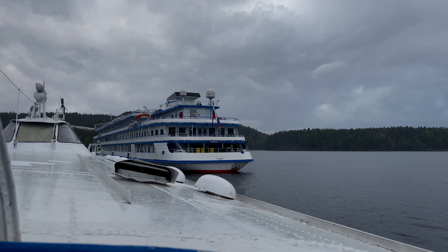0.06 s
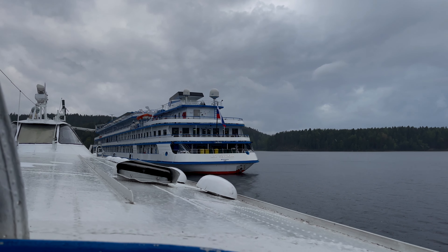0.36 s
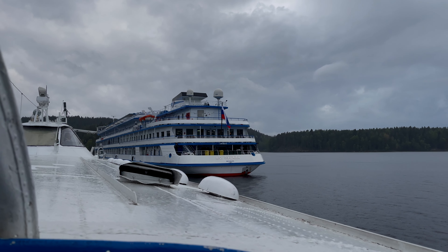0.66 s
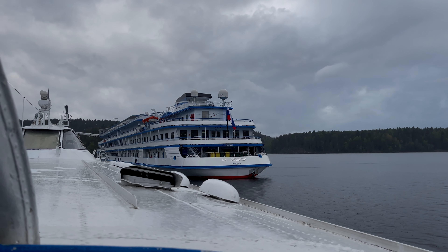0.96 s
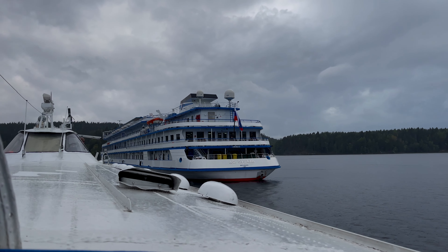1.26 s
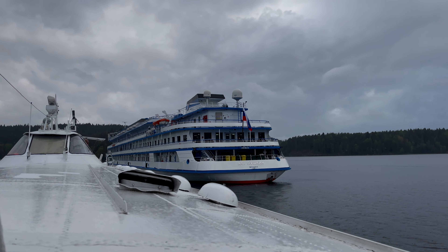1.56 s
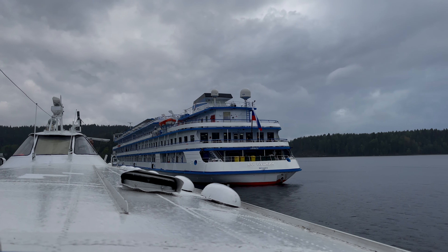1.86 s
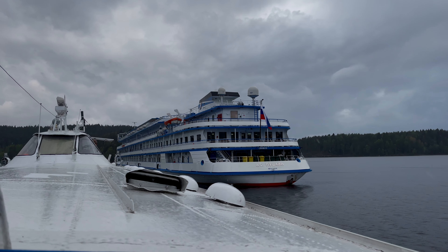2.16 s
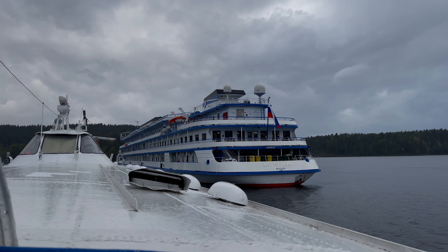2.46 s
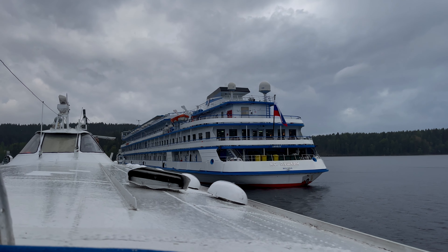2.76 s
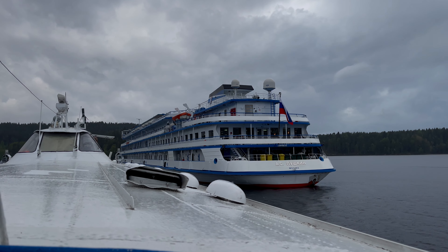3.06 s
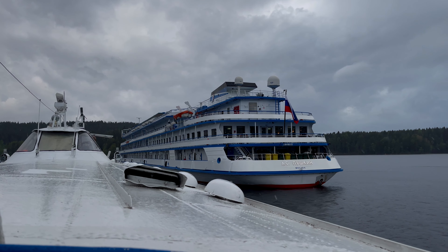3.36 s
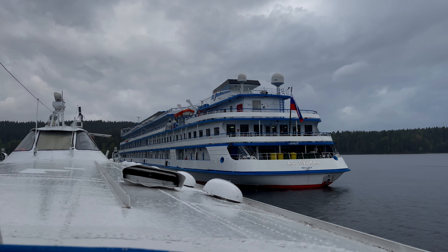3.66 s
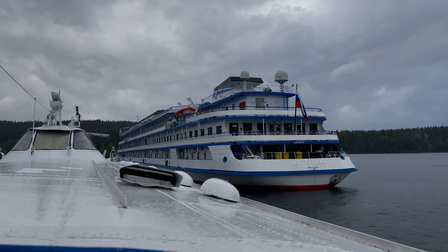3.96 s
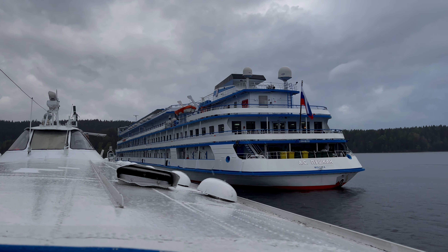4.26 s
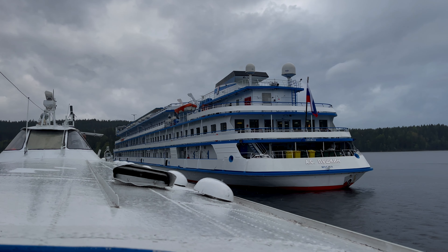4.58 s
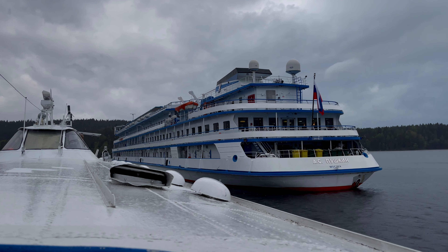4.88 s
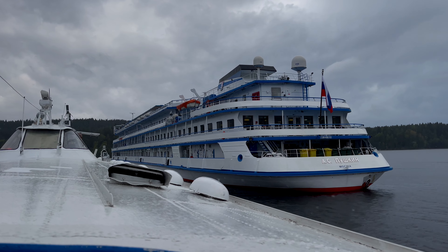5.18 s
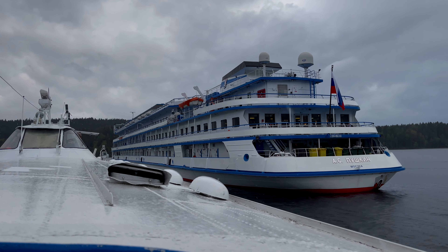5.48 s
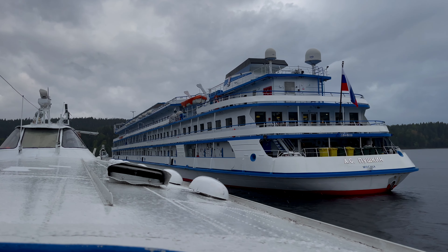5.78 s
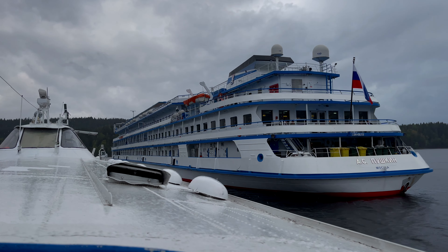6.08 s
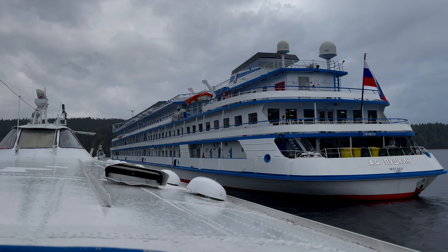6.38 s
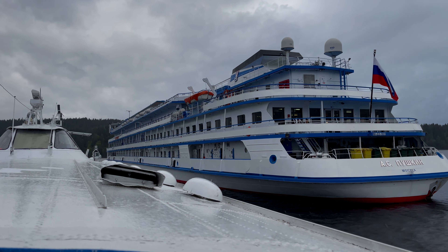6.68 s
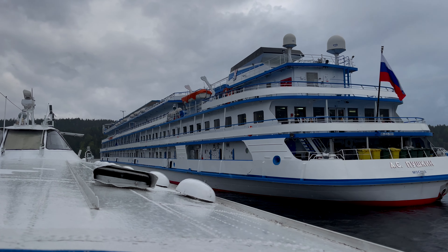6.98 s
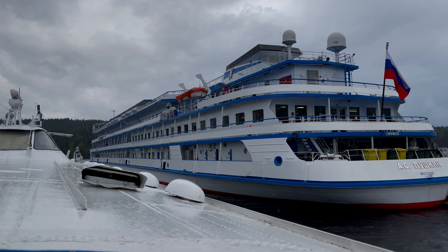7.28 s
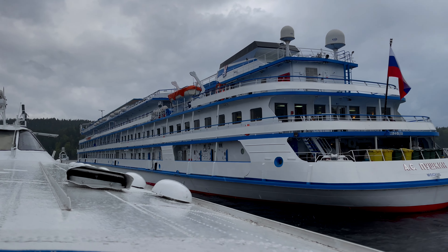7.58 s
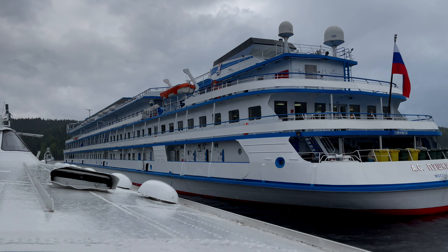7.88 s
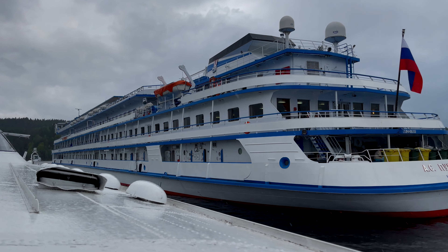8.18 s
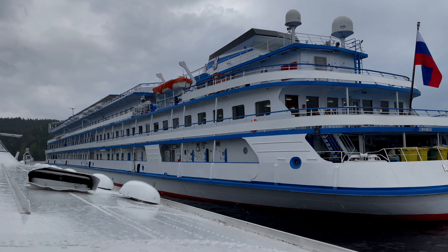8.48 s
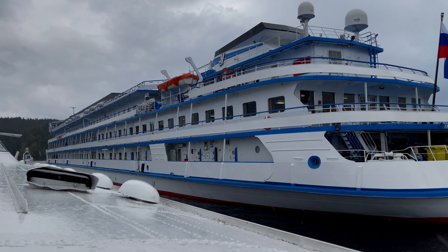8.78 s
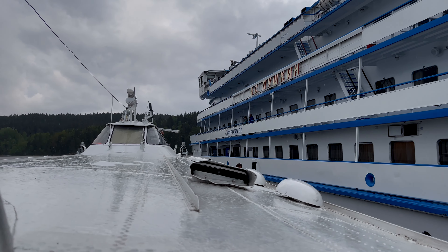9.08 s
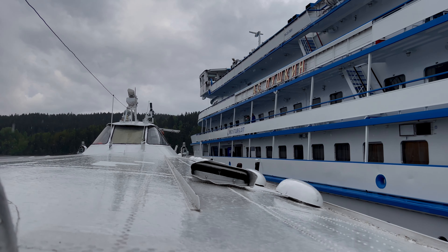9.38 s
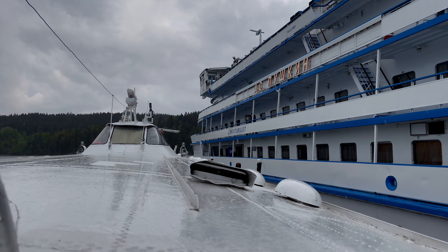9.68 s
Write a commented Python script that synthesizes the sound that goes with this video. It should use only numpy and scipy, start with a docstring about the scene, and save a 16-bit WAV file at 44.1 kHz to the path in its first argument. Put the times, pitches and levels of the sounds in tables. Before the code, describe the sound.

Ship diesels throb under rushing wind and water with thin whines, ease off halfway, then a closer engine swells with spray.

```python
"""On a lake, on the open deck of a small motor boat closing on a river cruise ship; stereo microphones.
Diesel exhausts throb under a rush of wind and water and ease off halfway. A turbocharger winds down,
gears whine, an air intake whistles and pumps hum. Close by, wind buffets the microphones, drops tick
and something knocks once. Near the end the sound cuts to the boat lying alongside: the whines are gone,
one engine swells and brighter spray washes up between the hulls."""
import sys
import numpy as np
from scipy import signal
from scipy.fft import rfft, irfft
from scipy.io import wavfile
from scipy.ndimage import uniform_filter1d

SR = 44100
rng = np.random.default_rng(int(sys.argv[2]) if len(sys.argv) > 2 else 0)


def wrap_up_sound(samples):
    """Save the sound to the file named by the first command line argument, as 16-bit audio."""
    columns = np.atleast_2d(samples).T
    # keep every value between -1 and 1, then stretch to whole-number steps
    tamed = np.clip(columns, -1, 1)
    steps = np.round(tamed * 32767).astype(np.int16)
    wavfile.write(sys.argv[1], SR, steps)


N = 429409
TIME = np.arange(N) / SR
SIDES = np.array([[.5], [-.5]])  # splits a left-right difference between the microphones
ALONGSIDE_S = 8.93


def amp(db):
    """Decibels to gain."""
    return 10 ** (np.asarray(db) / 20)


def at_hz(points, hz):
    """A spectrum's value at hz, on a log-frequency axis."""
    freqs, values = np.transpose(points)
    return np.interp(np.log(hz + 1), np.log(freqs + 1), values)


def follow(rows):
    """Each column of a timed curve, sample by sample."""
    times, *columns = np.transpose(rows)
    return [np.interp(TIME, times, column) for column in columns]


def drift(rate_hz):
    """Random wander of rms 1, with changes up to about rate_hz."""
    hz = np.fft.rfftfreq(N // 64 + 2, 64 / SR)
    wander = irfft(rfft(rng.standard_normal(N // 64 + 2)) / np.sqrt(1 + (hz / rate_hz) ** 4))
    return np.interp(np.arange(N) / 64, np.arange(len(wander)), wander / wander.std())


def pulse(hz):
    """A cosine that follows a changing rate."""
    return np.cos(2 * np.pi * np.cumsum(hz) / SR)


def add(mix, start_s, sound):
    """Adds a stereo sound to the mix."""
    part = mix[:, max(round(start_s * SR), 0):][:, :sound.shape[1]]
    part += sound[:, :part.shape[1]]


# How far the left microphone on deck leads the right: freq_hz, lead_rad
MIC_LEAD = [(0, -0.35), (500, 0.24), (1100, .5), (1500, 3), (2400, 5.5), (3400, 9.5), (4000, 11),
            (5300, 16), (6100, 19), (6800, 19.5), (7150, 17.5), (7900, 19.5), (8600, 20.5), (9700, 16.5),
            (10400, 15.5), (11700, 12.5)]
# How much louder the left microphone is: freq_hz, pan_db
MIC_BALANCE = [(60, -0.5), (110, 2), (200, 1), (350, 2.5), (640, 2.5), (1150, 2), (2080, -1.5), (3750, -1),
               (6770, -2), (12200, 0.5)]
def tone(hz, db, scatter, flutter_hz, lead=None, pan_db=None, crest_s=0):
    """One partial at both microphones: a direct path plus wavering echoes off water and steel."""
    carrier = np.exp(2j * np.pi * (np.cumsum(hz * np.ones(N)) / SR - np.mean(hz) * crest_s))
    lead = at_hz(MIC_LEAD, np.mean(hz)) if lead is None else lead
    pan_db = at_hz(MIC_BALANCE, np.mean(hz)) if pan_db is None else pan_db
    echoes = np.array([drift(flutter_hz) + 1j * drift(flutter_hz) for _ in range(2)]) / np.sqrt(2)
    paths = (np.exp(1j * SIDES * lead) + scatter * echoes) / np.sqrt(1 + scatter ** 2)
    return np.sqrt(2) * amp(db + SIDES * pan_db) * (carrier * paths).real


# How alike the rush is at the two microphones, clipped to 0-1 in use: freq_hz, likeness
MIC_LIKENESS = [(60, 0.83), (330, 0.82), (550, 0.2), (800, 0.54), (1300, -0.4), (1750, 0.33), (2300, -0.03),
                (3200, .5), (3800, -0.58), (5500, 0.7), (6400, 0.6), (7000, 0), (8500, 0.7), (8900, 6),
                (9500, 1), (10200, 3.5), (11400, 2.7), (11800, -3)]
def rush(spectrum, resonances, hiss_db, patchy_db, gust_db, bass_db, surge, swell_db, fade_db_per_s=0):
    """Turbulent noise with drifting patches and gusts, coloured by resonances that surge together."""
    frames = dict(fs=SR, nperseg=2048, noverlap=1536)
    hz, t, (left, other) = signal.stft(rng.standard_normal((2, N)) * np.sqrt(SR / 2), **frames)
    hz = hz[:, None]
    alike = np.clip(at_hz(MIC_LIKENESS, hz), 0, 1)
    right = (alike * left + np.sqrt(1 - alike ** 2) * other) * np.exp(-1j * at_hz(MIC_LEAD, hz))
    tilt = amp(at_hz(MIC_BALANCE, hz) / 2)
    lows = 1 / (1 + (hz / 300) ** 2)
    highs = 1 / (1 + (4500 / (hz + 1)) ** 4)
    db = at_hz(spectrum, hz) + bass_db / (1 + (hz / 120) ** 4)
    db -= 10 * np.log10(1 + (hz / 12700) ** 60)  # steep top edge of the hiss
    db = db + lows * swell_db * np.interp(t, TIME, drift(1.8))
    db += (1 - highs) * fade_db_per_s * (t.mean() - t)
    db += highs * np.interp(t, TIME, hiss_db)
    lifts_db = sum(lift * .5 ** (2 * (hz - centre) / width) ** 2 for centre, width, lift in resonances)
    db += lifts_db * (1 + surge * np.interp(t, TIME, drift(18)))
    patches = uniform_filter1d(rng.standard_normal(left.shape), 20, axis=0)
    patches = uniform_filter1d(patches, 7, axis=1)
    db += patchy_db * patches / patches.std() * (1 - .5 * highs)
    db += gust_db * np.interp(t, TIME, drift(20))
    return signal.istft(np.array([left * tilt, right / tilt]) * amp(db), **frames)[1][:, :N]


# Exhaust, wind and water, from the deck some way behind the ship: freq_hz, level_db
ASTERN_SPECTRUM = [(20, -69), (42, -38), (100, -35), (200, -44.5), (400, -54), (780, -53.5), (1500, -61),
                   (2200, -67), (3600, -74), (6400, -78), (7200, -82), (8600, -85.5), (10400, -81),
                   (11700, -89.5), (13000, -108.9)]
# Casings and air intakes ringing across the water: centre_hz, width_hz, lift_db
ASTERN_CASINGS = [(119, 23.5, -5), (319, 8.8, 6.5), (331, 6.9, 6), (501, 127, 3.5), (636.1, 16.8, 9.5),
                  (724, 32, 3.5), (846, 67, 0.5), (1020, 150, -1), (1327, 63, 5), (2880, 590, 6),
                  (2990, 100, 1.5), (3030, 80, -1)]
def rush_astern():
    """The roar behind the ship, with a hiss of water that sinks as the boat slows."""
    return rush(ASTERN_SPECTRUM, ASTERN_CASINGS, hiss_db=0.28 - 0.24 * TIME, patchy_db=1.17,
                gust_db=0.44, bass_db=-3.5, surge=0.28, swell_db=1.0, fade_db_per_s=0.09)


# Exhaust, wind and water, close beside the hull: freq_hz, level_db
ALONGSIDE_SPECTRUM = [(20, -59), (42, -37.5), (100, -44.5), (200, -47), (350, -53.5), (650, -52),
                      (1100, -59.5), (2200, -66), (3600, -75), (6400, -76.5), (8400, -81.5), (10400, -75.5),
                      (11700, -83.5), (13000, -107.0)]
# Casings ringing at close range: centre_hz, width_hz, lift_db
ALONGSIDE_CASINGS = [(135, 60, 0.5), (295, 19, 3.7), (464, 19, 9.2), (670, 23, 2.6), (960, 20, 3)]
# Spray between the hulls, near the microphones: peak_s, half_length_s, lift_db
SPRAY_WASHES = [(9.086, 0.18, 5), (9.604, 0.17, 7.5)]
def rush_alongside(lull_db=-4.5):
    """The roar beside the hull, its hiss lifted twice as spray washes up."""
    spray_db = sum(db * np.exp(-((TIME - peak_s) / half_s) ** 2) for peak_s, half_s, db in SPRAY_WASHES)
    return rush(ALONGSIDE_SPECTRUM, ALONGSIDE_CASINGS, hiss_db=lull_db + spray_db, patchy_db=0.7,
                gust_db=1.16, bass_db=-1.5, surge=.12, swell_db=-1.5)


# Pumps and fans, faint across the water: pitch_hz, level_db
PUMP_HUMS = [(293, -37.5), (340, -35.5), (635.5, -38.5), (746, -37), (1105, -54), (1185, -45.5),
             (1402, -44.5), (1483, -43)]
def pumps():
    """Pumps and fans hold their notes, heard mostly by way of echoes."""
    return sum(tone(hz, db, scatter=1.2, flutter_hz=5.2) for hz, db in PUMP_HUMS)


def intake(pitch_hz=2815, warble_hz=16.77, wander_hz=14, gulp_hz=70):
    """An air intake whistles in rough bursts, chopped by the gulps of the cylinders."""
    hz = pitch_hz + warble_hz * drift(20.8) + wander_hz * drift(4.18)
    gulps = 1 + 0.23 * pulse(gulp_hz * (1 + 0.086 * drift(9.7)))
    db = -44.5 + 0.29 * TIME + 3.5 * drift(18)  # grows as the boat nears
    return gulps * tone(hz, db, scatter=1.0, flutter_hz=36)


# Gear whine surging and fading, heard from astern, a little to the right: time_s, level_db
GEAR_WHINE = [(0, -42.5), (.55, -43), (1.15, -49), (1.95, -42), (2.2, -51), (2.65, -38), (2.83, -50),
              (3.25, -38.5), (3.72, -41.5), (4.15, -38), (4.95, -52), (5.17, -39), (5.35, -42),
              (5.95, -39.5), (6.1, -58), (6.8, -41), (7.1, -43), (7.8, -45), (8.35, -47), (8.78, -43),
              (8.89, -38)]
# Its octave, a little to the left: time_s, level_db
GEAR_OVERTONE = [(0, -52), (.7, -48), (1.2, -58), (2.25, -46), (2.6, -61), (3.3, -55), (3.8, -52),
                 (4.5, -50.5), (4.8, -56), (6.5, -52.5), (7.1, -64), (8.9, -63)]
def gears(pitch_hz=2449, rise_hz=47.04, settle_s=3.6, burst_db=2.0, throb_db=1.5, throb_hz=5.7):
    """An uneven mesh whines in fluttering bursts, several a second, and creeps up to its note."""
    hz = pitch_hz - rise_hz * np.exp(-TIME / settle_s) + 4 * drift(23.4)
    throb = pulse(throb_hz * (1 + 0.22 * drift(1.8)))
    db = follow(GEAR_WHINE)[0] + throb_db * throb + burst_db * drift(6.8)
    octave_db = follow(GEAR_OVERTONE)[0] + burst_db * drift(14) + throb_db * (throb - .5)
    return (tone(hz, db, scatter=0.8, flutter_hz=11.6, lead=-0.98, pan_db=-3.5)
            + tone(2 * hz, octave_db, scatter=1.2, flutter_hz=15, lead=.88, pan_db=4.0))


# Turbocharger from astern, fading and shifting with its echo off the water: time_s, level_db, lead_rad
TURBO_WHINE = [(0, -31, -3), (.25, -48, -2.5), (.52, -36, -2), (.78, -47, 2), (.98, -31, -3),
               (1.12, -37, -2), (1.27, -33.5, -2.2), (1.37, -40, -1.5), (1.47, -32.5, -2), (2.08, -35, -1),
               (2.36, -35, -3), (2.6, -29.5, -1.5), (2.78, -36, -4.5), (2.93, -31.5, -1.7),
               (3.15, -36, -3.5), (3.32, -42.5, 1), (3.57, -32, -2), (3.78, -45.5, -2), (4, -32, -2),
               (4.35, -30.5, -2.5), (4.68, -45, -0.5), (5.18, -43, -2.5), (5.42, -28, -3), (5.65, -48, -2),
               (5.8, -36, -2.8), (6.1, -42, -3.5), (6.25, -46, -2), (6.8, -37, -2.5), (8, -43, -2.5),
               (8.7, -38.5, -2)]
# Its faint octave, reaching the deck mostly as echo: time_s, level_db
TURBO_OVERTONE = [(0, -54), (1.8, -48), (2.6, -58), (3.1, -47), (4, -52), (5.1, -56), (5.7, -46),
                  (6.1, -58), (6.5, -52), (7.2, -62), (8.2, -62), (8.7, -48)]
def turbocharger(idle_hz=1800, sag_hz_per_s=10.3, excess_hz=206, coast_s=2.15):
    """The turbine coasts down towards an idling note that itself sinks slowly."""
    hz = idle_hz - sag_hz_per_s * TIME + excess_hz * np.exp(-TIME / coast_s) + 2.5 * drift(11.6)
    db, lead = follow(TURBO_WHINE)
    return (tone(hz, db, scatter=0.33, flutter_hz=10.5, lead=lead, pan_db=-2.5)
            + tone(2 * hz, follow(TURBO_OVERTONE)[0], scatter=2.6, flutter_hz=8.4))


# Short ticks near the microphones, from drops and the bright fizz of the knock:
# start_s, level_db, decay_s, pitch_hz, width_octaves
NEAR_TICKS = [(.708, -28, .0022, 11300, .1), (0.795, -30, .022, 5500, 0.28), (1.175, -31, .002, 7500, .3),
              (1.192, -30, 0.0045, 11000, 0.23), (1.28, -24.5, .001, 3500, .5),
              (1.686, -27, 0.009, 10800, 0.46), (1.793, -33, .003, 9500, .15),
              (1.95, -26, 0.0028, 8700, .06), (2.177, -27.5, .0012, 11500, .35),
              (2.258, -30, .0008, 11500, .2), (2.268, -36, .001, 11500, .2),
              (3.663, -19, 0.0016, 11000, 0.55), (8.927, -21, 0.00094, 3000, 0.99)]
def ticks(ring_db=-34, ring_s=0.02):
    """Each tick is a dry burst of noise around its own pitch, with a faint ring after it."""
    out, t = np.zeros((2, N)), np.arange(4096) / SR
    hz = np.fft.rfftfreq(len(t), 1 / SR) + 1
    band_edges = (1 + (1100 / hz) ** 4) * (1 + (hz / 12300) ** 30)
    for start_s, db, decay_s, pitch_hz, octaves in NEAR_TICKS:
        colour = 1 / np.sqrt((1 + (np.log2(hz / pitch_hz) / octaves) ** 2) * band_edges)
        noise = rng.standard_normal(len(t)) + .3 * rng.standard_normal((2, len(t)))
        attack = np.minimum(t / (.5 * decay_s), 1)
        decay = np.exp(-t / decay_s) + amp(ring_db) * np.exp(-t / ring_s)
        burst = irfft(rfft(noise) * colour) * attack * decay
        add(out, start_s, amp(db) * burst / abs(burst).max())
    return out


# A hard knock and its rebound, just left of the microphones: start_s, level_db, pitch_hz, pan_db
KNOCK_CONTACTS = [(3.6641, -9, 2300, 11), (3.665, -13, 3400, 5)]
def knock(decay_cycles=0.52):
    """Each contact is a sharp snap that dies within a cycle or two."""
    out, t = np.zeros((2, N)), np.arange(400) / SR
    for start_s, db, hz, pan_db in KNOCK_CONTACTS:
        snap = np.sin(2 * np.pi * hz * t) * np.exp(-hz * t / decay_cycles)
        add(out, start_s, amp(db + SIDES * pan_db) * snap / snap.max())
    return out


# Wind right on the microphones, harder on the left: peak_s, level_db, pitch_hz, half_length_s, pan_db
WIND_EDDIES = [(0.817, -2.5, 260, 0.0039, 5), (1.084, -11.5, 350, 0.0046, 9), (1.104, -6, 205, 0.0084, 7),
               (1.142, -8, 288, .005, 6), (1.155, -7, 200, 0.0055, 8), (1.299, -6, 213, 0.0046, 5),
               (1.311, -9, 272, 0.0036, 9), (2.663, -3, 255, 0.0065, 6), (2.700, 0, 313, 0.0035, 6),
               (2.864, -6, 220, 0.0042, 13), (2.963, -4.5, 273, 0.0035, 4), (3.164, -7, 171, .005, 7),
               (3.230, -6.5, 215, 0.0056, 6), (4.815, -8.5, 300, 0.0054, 5), (6.015, -8.5, 310, .005, 8),
               (6.369, -10, 296, 0.0044, 8), (6.855, -9.5, 232, 0.01, 3)]
def wind_buffets(gain_db=-3.5, rough=0.29, push_db=-3.0, push_hz=112, push_half_s=0.0065):
    """Each eddy gives a short dull slap, followed by a low push of air."""
    out, t = np.zeros((2, N)), np.arange(-1300, 1800) / SR
    swirl_band = signal.butter(3, [130, 560], "band", fs=SR, output="sos")
    push_t = t - 0.0118
    push = amp(push_db) * np.cos(2 * np.pi * push_hz * push_t) * np.exp(-(push_t / push_half_s) ** 2)
    for peak_s, db, hz, half_s, pan_db in WIND_EDDIES:
        swirl = signal.sosfilt(swirl_band, rng.standard_normal(len(t)))
        slap = (np.cos(2 * np.pi * hz * t) + rough * swirl / swirl.std()) * np.exp(-(t / half_s) ** 2)
        add(out, peak_s + t[0], amp(db + gain_db + SIDES * pan_db) * (slap + push))
    return out


# Low engine drones and their overtones, heard from astern: pitch_hz, loaded_db, eased_db, sinks_from_s
ENGINE_DRONES = [(60.7, -31, -27, 8.65), (85.4, -28.5, -29.5, 8.1), (101.5, -47, -31.5, 7.3),
                 (168.9, -42.5, -34, 8.9), (214.2, -44, -38.5, 8.9)]
def drones(eased, slowing_per_s=0.344):
    """Low engine drones and their overtones; each note wavers, then sinks."""
    out = np.zeros((2, N))
    for hz, loaded_db, eased_db, sinks_from_s in ENGINE_DRONES:
        pace = np.exp(-slowing_per_s * np.maximum(TIME - sinks_from_s, 0))
        pace *= 1 + 0.00768 * drift(1.83)
        out += tone(hz * pace, loaded_db + (eased_db - loaded_db) * eased, scatter=0.42, flutter_hz=2.4)
    return out


# Crankshaft speed of the main diesels: time_s, speed_hz
CRANK_SPEED = [(0, 18.19), (2.2, 18.23), (3.2, 18.4), (3.8, 18.27)]
# Their exhausts from astern, crank orders 4, 5 and 6: loaded_db, eased_db, fade_db_per_s, twin_share
EXHAUST_ORDERS = [(-20, -33.5, 0.33, 0.15), (-19.5, -26, 1.2, 0), (-36, -30.5, 0, 0.52)]
# The exhausts swelling and dipping on deck as the load varies: time_s, gain_db
LOAD_SWELL = [(0, 0.5), (.45, -0.5), (1.3, 1.5), (2.05, -0.5), (2.25, -3), (2.85, -7.5), (3.2, 0), (3.8, 0),
              (4.3, 1.5), (4.7, -1.5)]
def diesels(roar, eased, beat_s=1.247, in_step_s=0.58, first_throb_s=0.02435, chug=0.024, throb=0.086):
    """Exhaust notes throb once a turn and beat between twin engines; the firings also pump the roar."""
    speed_hz = follow(CRANK_SPEED)[0] * (1 + 0.0012 * drift(1.3))
    twin = np.exp(2j * np.pi * (TIME - in_step_s) / beat_s)
    exhaust = np.zeros((2, N))
    for order, (loaded_db, eased_db, fade_db_per_s, twin_share) in enumerate(EXHAUST_ORDERS, 4):
        db = loaded_db + (eased_db - loaded_db) * eased - fade_db_per_s * TIME + follow(LOAD_SWELL)[0]
        note = tone(order * speed_hz, db, scatter=0.1, flutter_hz=2.6, crest_s=first_throb_s)
        exhaust += abs(1 + twin_share * twin) * note
    crank_rad = 2 * np.pi * (np.cumsum(speed_hz) / SR - speed_hz[0] * first_throb_s)
    firing = np.cos(4 * crank_rad) + np.cos(5 * crank_rad) + .7 * np.cos(6 * crank_rad)
    rumble = signal.sosfiltfilt(signal.butter(2, 260, fs=SR, output="sos"), roar)
    rumble *= throb * (1 - eased) * (np.cos(crank_rad) - .5)  # only under load
    return exhaust + roar * (1 + chug * firing) + rumble


# The boat's own exhaust, close by as it lies alongside: time_s, level_db
THROTTLE_SWELL = [(8.9, -24.5), (9.07, -13.5), (9.28, -27), (9.42, -17), (9.6, -19)]
def throttle_push(top_s=9.34, top_hz=87.8, arch_hz_per_s2=58):
    """A brief push of throttle: the exhaust note rises and falls, with a half order under it."""
    hz = top_hz - arch_hz_per_s2 * (np.maximum(TIME, ALONGSIDE_S) - top_s) ** 2
    db = follow(THROTTLE_SWELL)[0]
    return tone(hz, db, scatter=0.084, flutter_hz=4.2) + tone(hz / 2, db - 8, scatter=.15, flutter_hz=4)


def scene(ease_s=4.8, ease_takes_s=0.19, crossfade_s=0.0067):
    """Astern of the ship, where the main engines ease off, then at once alongside it."""
    eased = np.clip((TIME - ease_s) / ease_takes_s + .5, 0, 1)
    engines = diesels(rush_astern(), eased) + drones(eased)
    astern = engines + pumps() + turbocharger() + gears() + intake() + wind_buffets()
    alongside = rush_alongside() + throttle_push()
    arrived = np.clip((TIME - ALONGSIDE_S) / crossfade_s, 0, 1)
    return np.sqrt(1 - arrived) * astern + np.sqrt(arrived) * alongside + ticks() + knock()


def record(dry, low_cut_hz=33, top_hz=16000, ceiling=.97, start_s=.023):
    """The microphones shed deep bass and top treble and round off peaks; sound starts after a moment."""
    thinned = signal.sosfilt(signal.butter(4, low_cut_hz, "high", fs=SR, output="sos"), dry)
    rounded = thinned / (1 + (thinned / ceiling) ** 8) ** (1 / 8)
    started = rounded * np.clip((TIME - start_s) / .002, 0, 1)
    lowpass = signal.firwin(255, top_hz, window=("kaiser", 8), fs=SR)
    return signal.oaconvolve(started, lowpass[None], "same")


dry = scene()
out = record(dry)
wrap_up_sound(out)
```